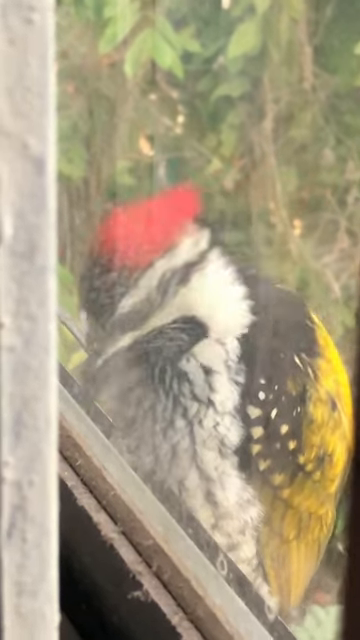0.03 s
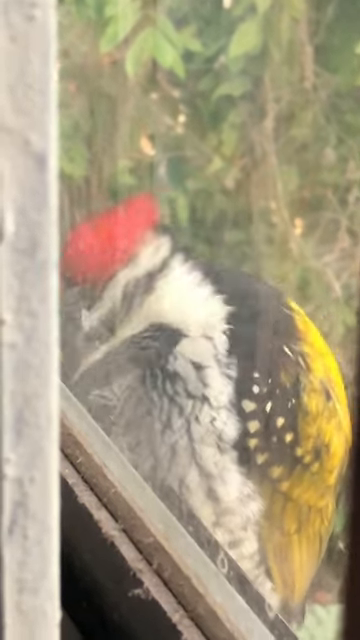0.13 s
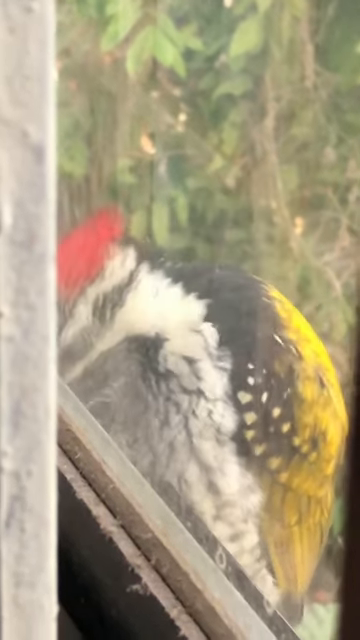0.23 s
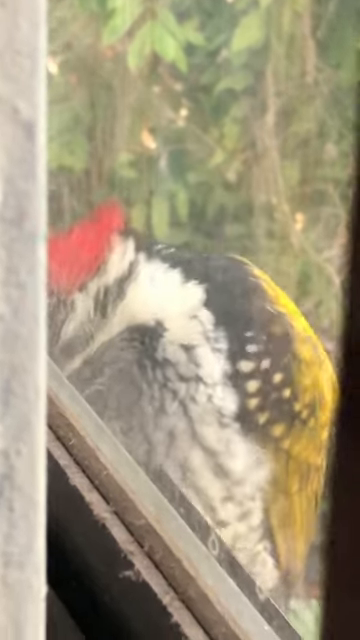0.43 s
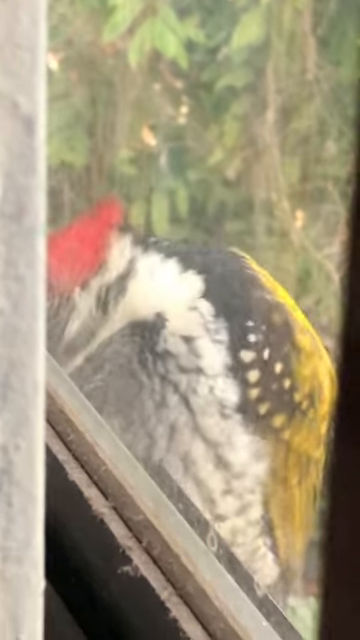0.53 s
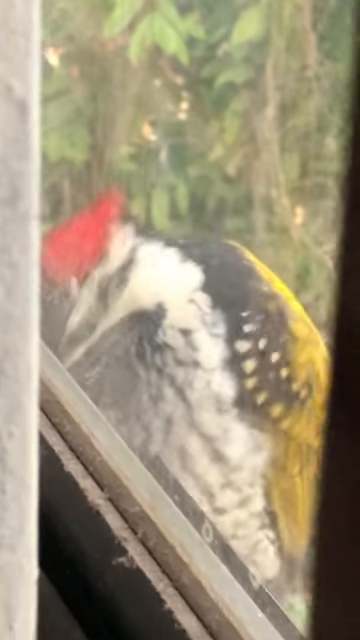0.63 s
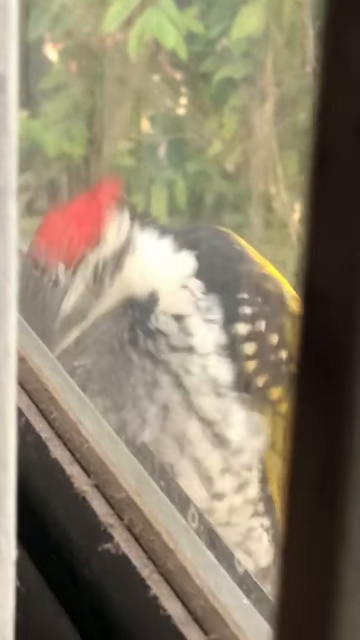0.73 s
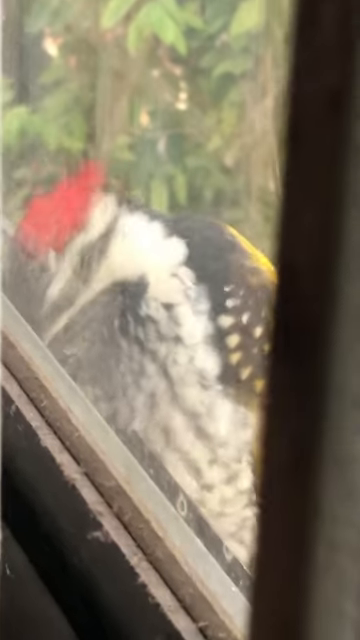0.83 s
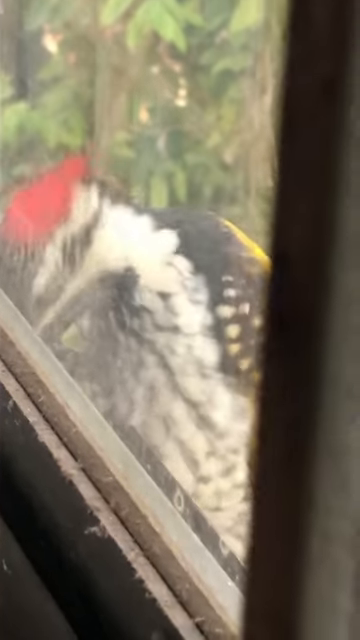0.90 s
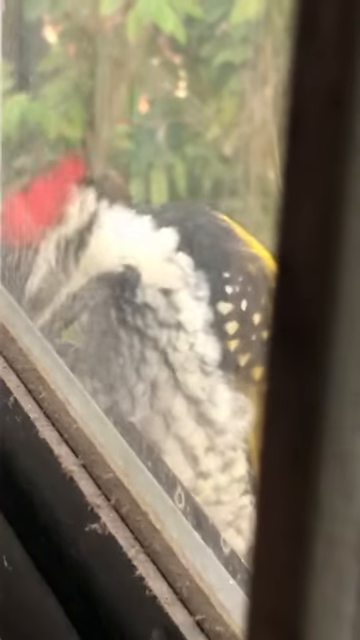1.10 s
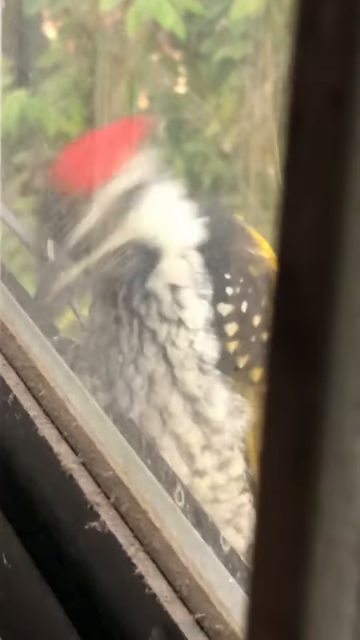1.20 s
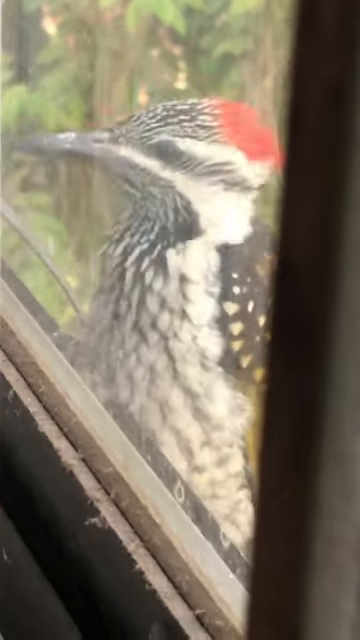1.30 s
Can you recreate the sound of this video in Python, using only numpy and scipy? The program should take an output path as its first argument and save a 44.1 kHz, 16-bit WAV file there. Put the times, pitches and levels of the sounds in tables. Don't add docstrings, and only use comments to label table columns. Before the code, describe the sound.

Close indoor microphone: sharp beak knocks on a window frame, first two separate taps with tiny claw scrapes, then a dense, even burst of hard hollow raps, a brief room tail, and faint low outdoor hum.

```python
import sys
import numpy as np
from scipy import signal
from scipy.fft import rfft, irfft
from scipy.io import wavfile

SR = 44100
rng = np.random.default_rng(int(sys.argv[2]) if len(sys.argv) > 2 else 0)


def volts(x):
    e = np.asarray(x, float) / 20
    return 10 ** e


def transcribe(u):
    v = np.clip(np.atleast_2d(u).T, -1, 1)
    q = np.round(v * 32767).astype(np.int16)
    wavfile.write(sys.argv[1], SR, q)


N = 59535
BLOW_SIZE, LEAD = 17640, 22


def read(points, hz):
    f, value = np.transpose(points)
    return np.interp(np.log(hz + 1), np.log(f + 1), value)


def add(mix, start_s, sound):
    part = mix[round(start_s * SR):][:len(sound)]
    part += sound[:len(part)]


def coloured(colour, count):
    hz = np.fft.rfftfreq(count, 1 / SR)
    noise = irfft(rfft(rng.standard_normal(count)) * volts(read(colour, hz)), count)
    return noise / np.sqrt(np.mean(noise ** 2) + 1e-20)


def dying(x, t60s):
    hz, t = np.fft.rfftfreq(len(x), 1 / SR), np.arange(len(x)) / SR
    spectrum = rfft(x)
    centres = np.transpose(t60s)[0]
    out = np.zeros(len(x))
    for one_band, (_, t60_s) in zip(np.eye(len(centres)), t60s):
        share = read(np.transpose([centres, one_band]), hz)
        out += irfft(spectrum * share, len(x)) * volts(-60 * t / t60_s)
    return out


def ring(t, hz, db, t60_s):
    u = np.maximum(t, 0)[:, None]
    return np.sin(2 * np.pi * hz * u) * volts(db - 60 * u / t60_s)


# pitch_hz, level_db (per Hz)
HUM = [(20, -32), (60, -10), (108, -3.5), (220, -9.5), (430, -20), (2500, -33.5), (9000, -41.5),
       (14000, -47)]
HUM_DB = -61


def outdoor_hum():
    return volts(HUM_DB) * coloured(HUM, N)


# delay_s, level_db
TICK_ARRIVALS = [(.0002, -1.3), (.000575, -9), (.001355, -14), (.00153, -5), (.00239, -13), (.00282, -15)]
TICK_HZ, TICK_WIDTH_S = 4790, .000117


def beak_tick(t):
    out = np.zeros(len(t))
    for delay_s, level_db in TICK_ARRIVALS:
        u = t - delay_s
        out += volts(level_db) * np.cos(2 * np.pi * TICK_HZ * u) * np.exp(-.5 * (u / TICK_WIDTH_S) ** 2)
    return out


# pitch_hz, level_db, t60_s, first_swing (sign)
FRAME = [(529, -19, 0.072, -1), (674.3, -7.5, 0.023, 1), (700, -18.5, 0.074, -1), (732, -4, 0.02, -1),
         (877, -5, 0.0095, 1), (899.2, -16, 0.14, 1), (958, -0.58, 0.036, -1), (992, 0.0, 0.018, 1),
         (1106, -15.5, 0.039, -1), (1251.7, -9, 0.045, -1), (1376, -23.5, 0.052, -1),
         (1460, -36.5, 0.27, 1), (1580, -28.5, 0.093, 1)]
FRAME_DB, FRAME_LAG_S = -1, .00006
SPOT_DB = .4


def hollow_frame(t, hard_db):
    hz, db, t60_s, swing = np.transpose(FRAME)
    db = db + FRAME_DB - hard_db + SPOT_DB * rng.standard_normal(len(db))
    return ring(t - FRAME_LAG_S, hz, db, t60_s) @ np.sign(swing)


# pitch_hz, level_db, t60_s, first_swing (sign)
PANE = [(1829.6, -25.5, 0.034, 1), (1981, -30.5, 0.086, 1), (2346, -26, 0.045, 1), (2660, -25.5, 0.074, 1),
        (2834, -23.5, 0.026, 1), (3101, -20.5, 0.019, -1), (3296, -26, 0.06, -1), (3516, -34.5, 0.052, -1),
        (3987, -23, 0.032, -1), (4336, -21.5, 0.064, 1), (4510, -31, 0.065, 1), (5030, -39, 0.1008, 1),
        (6190, -32.5, 0.2481, 1), (6886, -32, 0.075, 1)]
PANE_LAG_S, LONGEST_S = .000148, .09
WANDER = .002


def pane(t):
    hz, db, t60_s, swing = np.transpose(PANE)
    hz = hz * (1 + WANDER * rng.standard_normal(len(hz)))
    return ring(t - PANE_LAG_S, hz, db, np.minimum(t60_s, LONGEST_S)) @ np.sign(swing)


# pitch_hz, level_db
RATTLE = [(1200, -8.5), (1900, -3), (2600, -1), (3500, -9), (4800, -2), (6300, -4), (7600, -1), (9000, -65)]
# pitch_hz, t60_s
RATTLE_T60 = [(1500, 0.084), (4500, 0.071), (8000, 0.037)]
RATTLE_DB, RATTLE_RISE_S = -17.5, 0.0005
RATTLE_CHANGE = .5


def loose_rattle(t, same):
    fresh = coloured(RATTLE, BLOW_SIZE)
    buzz = np.sqrt(1 - RATTLE_CHANGE ** 2) * same + RATTLE_CHANGE * fresh
    return volts(RATTLE_DB) * dying(buzz, RATTLE_T60) * np.clip(t / RATTLE_RISE_S, 0, 1)


# pitch_hz, level_db
SIZZLE = [(6000, -23), (8300, 0.5), (10500, -3), (12500, -3), (15500, -6.5), (16000, -18), (17000, -22)]
# pitch_hz, t60_s
SIZZLE_T60 = [(8000, 0.059), (12000, 0.04), (16000, 0.047)]
SIZZLE_DB = -35


def edge_sizzle(t, sizzle_db, same):
    hiss = 2 * same + coloured(SIZZLE, BLOW_SIZE)
    rise = np.clip(t * 2000 + .6, 0, 1)
    return volts(SIZZLE_DB + sizzle_db) * dying(hiss, SIZZLE_T60) * rise


# pitch_hz, level_db, t60_s
WALL = [(307.5, -45, 0.3), (409, -46.5, 0.48), (836.6, -37.5, 0.71), (859, -36, 1), (892, -41.5, 0.68),
        (953, -42, 0.59)]
WALL_RISE_S = 0.0069


def wall_boom(t):
    return ring(t, *np.transpose(WALL)).sum(1) * np.clip(t / WALL_RISE_S, 0, 1)


# start_s, tick_db, hard_db (tick over ring), sizzle_db
PECKS = [(0.1512, -37, 3.5, 14.5), (0.2365, -16.5, 3, 0), (0.3282, -31.5, -6.5, -1),
         (0.3703, -31.5, -4, -3), (0.3971, -19, 0.5, 0.5), (0.4385, -15, 1.5, -0.5), (0.4728, -13, 0.2, 4),
         (0.5098, -13, -1.3, 4.3), (0.5483, -12.5, -0.9, 4), (0.5865, -9.5, -0.5, 4),
         (0.6226, -10, -1.5, 3.5), (0.664, -13, -2.8, 1.8), (0.702, -9, -1.7, 2.3), (0.7428, -10, 1.5, -3),
         (0.7827, -9, 4.5, 1.3), (0.8238, -8, 3.5, 5), (0.8656, -8.5, 1.5, 2.5), (0.9077, -10, 1.5, 2),
         (0.9493, -10.5, 0.1, 0.5), (0.9899, -9.5, 0, 1.7), (1.0297, -10.5, 0.2, 3), (1.0696, -12, -2, 3.5),
         (1.1123, -13, -0.6, 0), (1.1583, -13, 4, 1.3)]
SMALL_HZ = 420


def drumming():
    small_parts, wall = np.zeros(N), np.zeros(N)
    same_rattle, same_hiss = coloured(RATTLE, BLOW_SIZE), coloured(SIZZLE, BLOW_SIZE)
    for start_s, tick_db, hard_db, sizzle_db in PECKS:
        between_samples = start_s * SR - round(start_s * SR)
        t = (np.arange(-LEAD, BLOW_SIZE - LEAD) - between_samples) / SR
        blow = beak_tick(t) + hollow_frame(t, hard_db) + pane(t)
        blow += loose_rattle(t, same_rattle) + edge_sizzle(t, sizzle_db, same_hiss)
        add(small_parts, start_s - LEAD / SR, volts(tick_db) * blow)
        add(wall, start_s - LEAD / SR, volts(tick_db - hard_db) * wall_boom(t))
    no_bass = signal.butter(3, SMALL_HZ, btype="high", fs=SR, output="sos")
    return signal.sosfiltfilt(no_bass, small_parts) + wall


# start_s, length_s, level_db, rise (share of length)
SCRAPES = [
    (0.1524, 0.024, -48.5, .06),
    (0.163, 0.058, -62, 0.55),
    (0.196, 0.043, -56.5, .9),
    (1.202, 0.21, -68.5, 0.31),
]
# pitch_hz, level_db
SCRAPE = [(1000, -4), (1900, 0.5), (3000, -8), (5100, 4), (8000, -13), (16000, -22)]


def claws():
    out = np.zeros(N)
    for start_s, length_s, level_db, rise in SCRAPES:
        u = np.arange(round(length_s * SR)) / (length_s * SR)
        fall = volts(-20 * (u - rise) / (1.01 - rise))
        shape = np.where(u < rise, u / rise, fall)
        add(out, start_s, volts(level_db) * shape * coloured(SCRAPE, len(u)))
    return out


# pitch_hz, level_db
ROOM_TONE = [(350, 4.5), (520, 5.5), (850, 5.5), (1100, -1.5), (2400, 1.5), (3500, -5.5), (5000, -11),
             (10000, -3.5)]
# pitch_hz, t60_s
ROOM_T60 = [(400, 0.58), (850, 0.52), (1500, 0.69), (3000, 0.54), (5000, 0.58), (12000, 0.41)]
ROOM_DB, ROOM_LAG_S = -16, 0.0048


def room(x):
    taps = np.zeros(SR)
    at = np.arange(0, SR - 20, 20) + rng.integers(0, 20, (SR - 1) // 20)
    taps[at] = rng.choice([-1., 1.], len(at))
    tone = volts(read(ROOM_TONE, np.fft.rfftfreq(SR, 1 / SR)))
    taps = irfft(rfft(taps) * tone, SR)
    build_up = np.clip(np.arange(SR) / SR / ROOM_LAG_S, 0, 1) ** 2
    tail = dying(taps, ROOM_T60) * build_up
    return volts(ROOM_DB) * signal.fftconvolve(x, tail / np.linalg.norm(tail))[:N]


def scene():
    bird = drumming() + claws()
    return (outdoor_hum() + bird + room(bird))[None]


def roll_off(x):
    return signal.sosfilt(signal.butter(12, 16800, fs=SR, output="sos"), x)


def record(dry):
    low_pass = signal.firwin(255, 16300, window=("kaiser", 6), fs=SR)
    mix = signal.oaconvolve(dry, low_pass[None], "same")
    return roll_off(mix)


dry = scene()
out = record(dry)
transcribe(out)
```